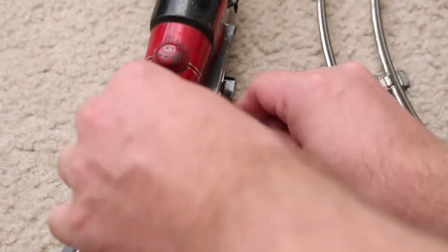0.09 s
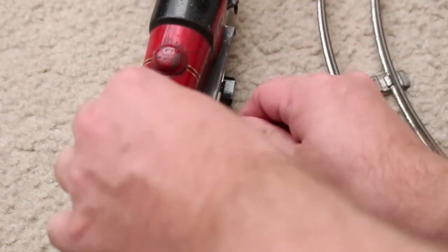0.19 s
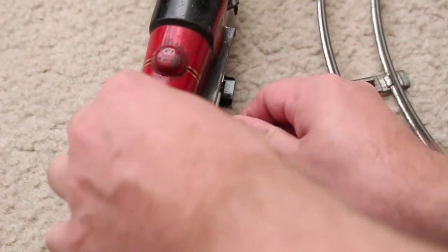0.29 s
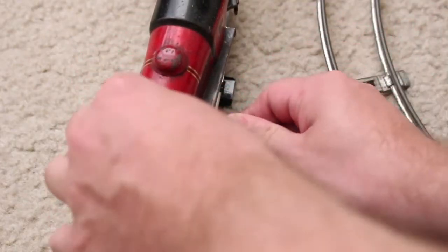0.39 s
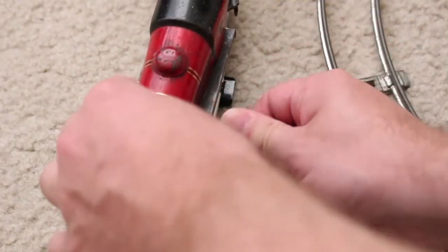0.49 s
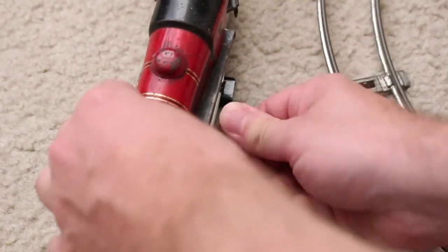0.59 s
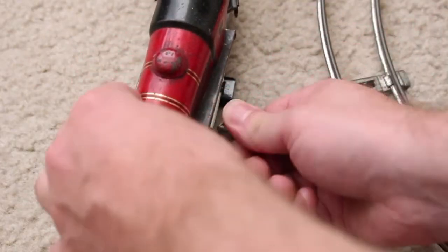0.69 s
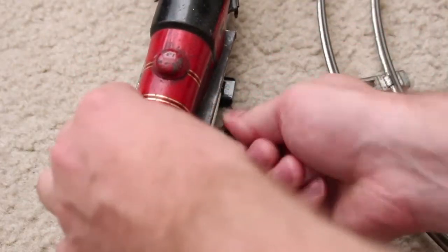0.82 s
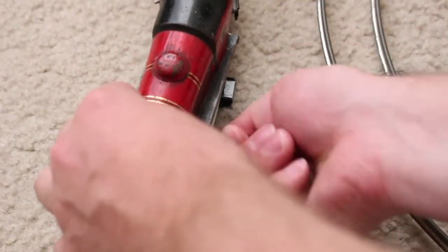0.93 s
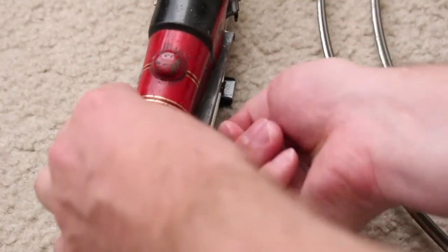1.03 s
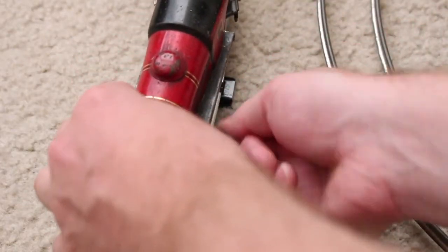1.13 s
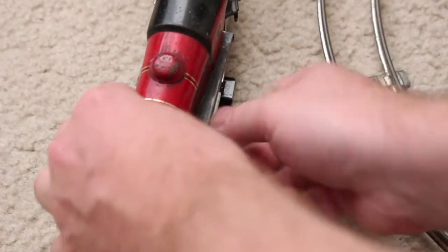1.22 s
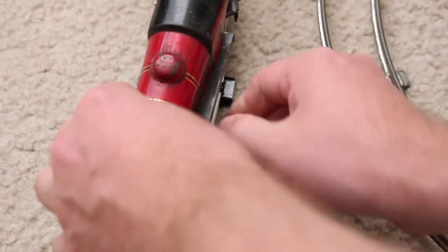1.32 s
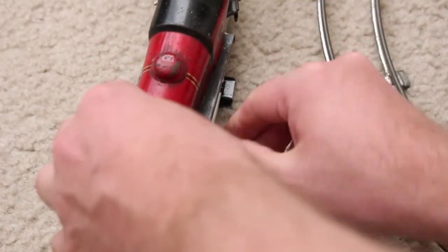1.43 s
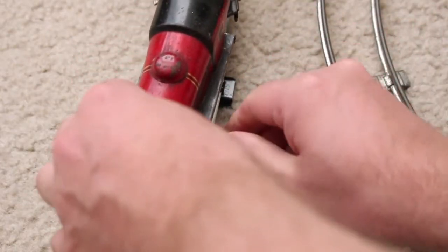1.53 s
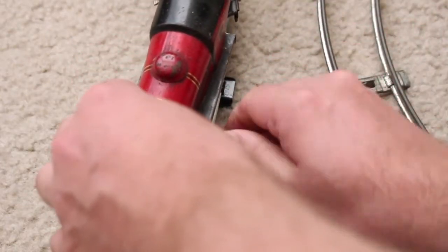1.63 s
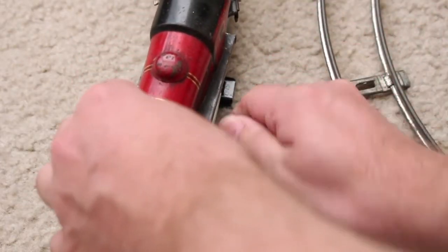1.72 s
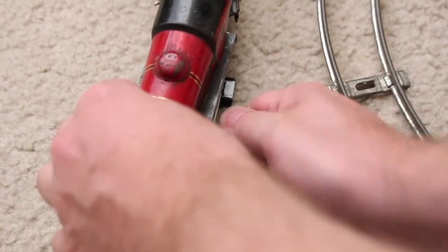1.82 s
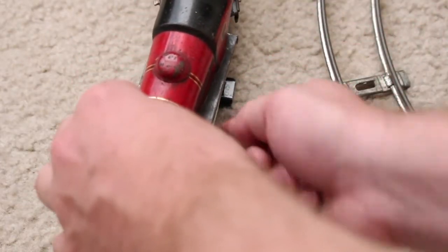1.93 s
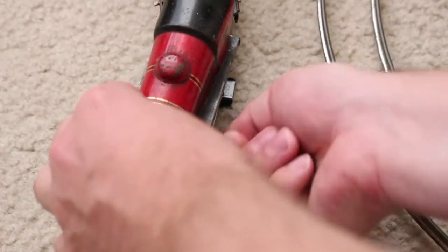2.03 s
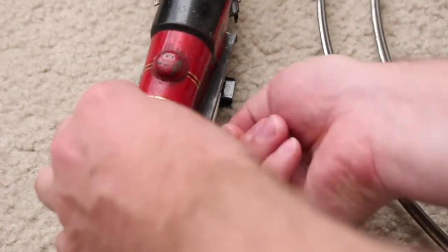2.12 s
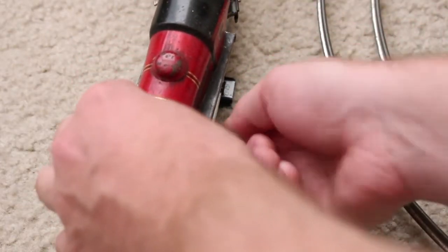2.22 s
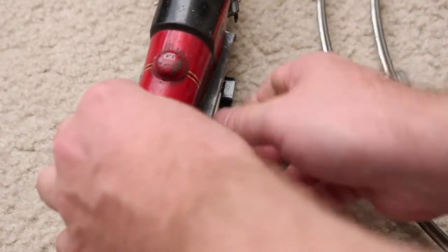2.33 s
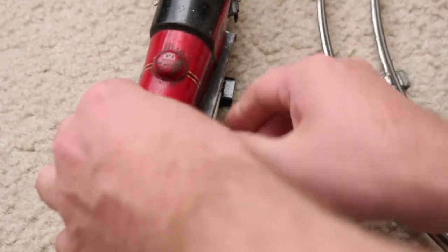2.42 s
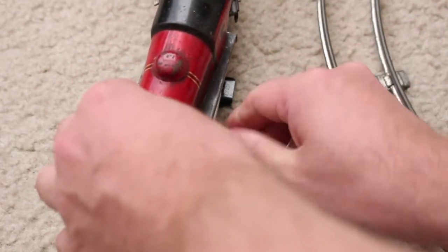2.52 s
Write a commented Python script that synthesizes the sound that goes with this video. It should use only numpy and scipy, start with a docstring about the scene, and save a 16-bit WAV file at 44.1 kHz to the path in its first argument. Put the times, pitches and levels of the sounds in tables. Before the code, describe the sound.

A key winds a tin toy train in two short runs of metallic clicks.

```python
"""A clockwork toy locomotive is wound by hand on a carpet in a quiet, faintly humming room.
First the key rubs and knocks in its socket. From 0.2 s to 1 s the pawl slips off five ratchet teeth;
each impact excites the modes of the tin body, a near surface reflects it and the room reverberates.
The key alone knocks and rubs between turns, until four quick clicks follow from 1.8 s to 2.1 s.
Loose knocks of the key close the winding at 2.5 s."""
import sys
import numpy as np
from scipy import signal
from scipy.fft import rfft, irfft
from scipy.io import wavfile
from scipy.ndimage import uniform_filter1d

SR = 44100
rng = np.random.default_rng(int(sys.argv[2]) if len(sys.argv) > 2 else 0)


def file_out(sig):
    """Save sig as 16-bit WAV at sys.argv[1]."""
    # one column per channel
    cols = np.atleast_2d(sig).T
    # limit, then scale
    lim = np.clip(cols, -1, 1)
    pcm = np.round(lim * 32767).astype(np.int16)
    wavfile.write(sys.argv[1], SR, pcm)


N = 112455

# Pawl impacts: (time [s], level [dB], thud [dB], clang centre [Hz], clang [dB], treble [dB],
# slip re level [dB], low ping [Hz], low ping [dB], high ping [Hz], high ping [dB])
PAWL_CLICKS = [ (0.2111, -0.5, -4, 1850, 5, 0, -6.5, 1585, 6.5, 8150, 6.5),
               (0.5950, -1.5, -4, 1300, 4.5, 0.5, -8.5, 2233, 9.5, 7970, 4.5),
               (0.7845, -7, 0, 1620, -4.5, -1, -7, 2053, 10.5, 3570, 12.5),
               (0.9138, -7.5, -4, 1450, 4.5, 0, 0.5, 1608, 12.5, 3550, 9.5),
               (0.9883, -10.5, 2.5, 1900, 0.5, 1, 1, 2020, 13, 10400, 3),
               (1.8288, -6.5, 3.5, 1990, 4, -2.5, -3, 2150, 6.5, 8080, 6.5),
               (1.918, -12, 10.5, 1300, 7, 1.5, -14, 3400, 6.5, 11000, 6.5),
               (2.0059, -6, -3.5, 1210, 5.5, -2.5, -13, 2100, 3.5, 3400, 6),
               (2.0927, -7, 4.5, 1520, 8.5, 0.5, -4, 1480, 0.5, 10900, 6)]
# Key impacts: (time [s], level [dB], thud [dB], clang centre [Hz], clang [dB], treble [dB])
KEY_KNOCKS = [ (0.051, -28, -25, 2270, 10, -19), (0.1473, -26.5, 16.5, 900, 0, -14),
              (0.586, -17, 8, 1700, -8, -17), (0.660, -28, -5, 1570, 19.5, -16),
              (0.976, -24, -1, 1910, 6, -5), (1.0132, -15.5, 0, 1820, 6.5, -7),
              (1.1015, -19.5, 6, 1710, -14, -13), (1.1076, -18, -7, 1620, 5, -0.5),
              (1.147, -24.5, 2, 1800, 2, -13), (1.1520, -21, 11, 1920, 6.5, 2),
              (1.245, -34, 9, 1570, 10, -1), (1.422, -27, 20, 1640, 8.5, -17),
              (1.4632, -24, 12.5, 950, 15, 5.5), (1.6878, -17.5, -7, 2200, 3, -9),
              (1.712, -40, 7, 2100, 24, -11), (1.715, -16.5, -0.5, 1350, -2.5, -1),
              (1.772, -27, -2, 2010, 10, -2), (1.998, -24, -18, 2050, 11, -5),
              (2.171, -27, -5, 1700, 11.5, -1), (2.213, -31.5, -5, 1700, 11, 1),
              (2.2231, -23, 1, 1580, -10, -5), (2.2290, -20, -13, 1600, 8.5, -0.5),
              (2.2686, -15.5, 6, 1800, 6, 2), (2.2829, -17.5, 10, 1780, 10.5, -1),
              (2.384, -38.5, 9, 1650, 18, -10), (2.5027, -33, 6, 1250, 11, 5),
              (2.5077, -22.5, 4.5, 1250, 8, 0.5)]
# Dull top of the key knocks, falling away above about 8.5 kHz: (frequency [Hz], gain [dB])
KNOCK_ROLLOFF = [(8500, 1), (12000, -7), (16000, -16)]
# Key friction as the hand shifts: (time [s], duration [s], level [dB])
KEY_RUBS = [(0.0, 0.06, -45.5), (0.191, 0.038, -42), (0.716, 0.029, -46.5), (0.941, 0.036, -43.5),
            (1.253, 0.059, -49), (1.415, 0.02, -54.5), (2.373, 0.021, -52)]
# Spectrum of sliding contact: (frequency [Hz], gain [dB])
SLIDE_SPECTRUM = [(200, 8), (800, -8.5), (1500, -3), (2400, -5.5), (4000, -11.5), (8000, -14.5),
                  (16000, -27.5)]
# Modes of the tin body and spring housing: (frequency [Hz], peak gain [dB], T60 [s])
TIN_MODES = [(595, -2, 0.034), (679, -1.5, 0.09), (856, -5.5, 0.022), (1337, 2.5, 0.049), (1330, -13, .06),
             (1574, 10.5, 0.63), (1584, 9.5, 0.087), (1690, 8, 0.14), (1730, 4.5, 0.063),
             (2157.5, 8.5, 0.042), (2455, 10.5, 0.16), (3134, 2.5, 0.017), (3587, 0.5, 0.045),
             (7740, -2.5, 0.016)]
# Dry crack of a contact: (frequency [Hz], gain [dB])
CRACK_SPECTRUM = [(100, -22), (300, -13), (600, -8.5), (1000, -3.5), (1400, 4.5), (2200, 1.5), (2800, -0.5),
                  (3400, -2), (4300, -1.5), (7000, -0.5), (11000, 0.5), (14300, -1.5), (16000, -15)]
# Spectrum of the reverberant tail: (frequency [Hz], gain [dB])
TAIL_SPECTRUM = [(200, 6), (800, -2.5), (1700, -6), (4000, 0.5), (9000, -1.5), (16000, -8)]
# Reverberation time: (frequency [Hz], T60 [s])
TAIL_T60 = [(200, 0.38), (800, 0.35), (2000, 0.27), (5500, 0.29), (9000, 0.23), (15000, 0.27)]
# Left-right coherence of the direct sound: (frequency [Hz], correlation [0 to 1])
DIRECT_COHERENCE = [(500, 1), (1800, 0.96), (4000, 0.69), (8000, 0), (14000, 0)]
# Left-right coherence of the diffuse field: (frequency [Hz], correlation [-1 to 1])
ROOM_COHERENCE = [(40, -0.71), (150, 0.11), (700, 0.07), (1700, 0.53), (4000, 0.25), (8000, 0.12),
                  (14000, -0.12)]
# Level difference between the channels: (frequency [Hz], left minus right [dB])
BALANCE = [(60, -8.5), (300, -2.5), (1200, -0.4), (2100, -2.5), (4000, 0), (8000, -0.5), (14000, -1.3)]
# Noise of the still room: (frequency [Hz], relative level [dB])
AIR_SPECTRUM = [(15, -53), (25, -7.5), (108, -8.5), (175, -3.5), (363, -12.5), (427, -7), (545, -13.5),
                (775, -13.5), (1890, -16.5), (2050, -14), (2480, -19.5), (3920, -20), (4870, -20.5),
                (6050, -21.5), (16000, -29.5)]
# Faint hum in the room: (frequency [Hz], RMS level [dB])
HUM_TONES = [(84, -76), (192, -76.5)]

SIZE, RESPONSE_SAMPLES = 24576, 20000  # transform size; the part of each response that is used
T = np.arange(SIZE) / SR
HZ = np.maximum(np.fft.rfftfreq(SIZE, 1 / SR), 1)
RISE_S, PAWL_CHATTER_S, KNOCK_CHATTER_S = 0.00075, 0.0021, 0.0034  # a loose knock chatters longer
SLIP_LEAD_S, SLIP_DECAY_S = 0.0024, 0.0049
ROOM_DELAY_S = 0.006
ROOM_DETAIL_SHARE = 0.45  # pings and small modes beam in all directions, so the room evens them out


def ratchet(tin):
    """Impact excitation: the pawl slides off a tooth, then snaps onto the next and rings the body."""
    out, slide = np.zeros((2, N)), minimum_phase(at_hz(SLIDE_SPECTRUM))
    for onset, db, *tone, slip_db, low_hz, low_db, high_hz, high_db in PAWL_CLICKS:
        near, diffuse = room()  # the moving hands scatter each click anew
        detail_db = ping(low_hz, low_db) + ping(high_hz, high_db) + small_modes()
        slip = from_db(db + slip_db) * burst(SLIP_DECAY_S) * slide * (near + diffuse)
        paths = near * minimum_phase(detail_db) + diffuse * minimum_phase(ROOM_DETAIL_SHARE * detail_db)
        snap = burst(PAWL_CHATTER_S) * minimum_phase(contact_colour(db, *tone)) * paths
        click = slip + snap * delay(SLIP_LEAD_S)
        add(out, onset - SLIP_LEAD_S, irfft(click * tin)[:, :RESPONSE_SAMPLES])
    return out


def key(tin, grains_per_s=2500, grain_spread_db=4.5):
    """Impact and friction: the loose key knocks and rubs in its socket, driving the body."""
    force, slide = np.zeros(N), minimum_phase(at_hz(SLIDE_SPECTRUM))
    for onset, *tone in KEY_KNOCKS:
        chatter = burst(KNOCK_CHATTER_S)
        colour_db = contact_colour(*tone) + at_hz(KNOCK_ROLLOFF) + ROOM_DETAIL_SHARE * small_modes()
        add(force, onset, irfft(chatter * minimum_phase(colour_db)))
    for onset, duration, db in KEY_RUBS:
        grains = (rng.random(SIZE) < grains_per_s / SR) * rng.choice([-1, 1], SIZE)
        grains = grains * from_db(grain_spread_db * rng.standard_normal(SIZE))
        rub = grains / grains.std() * (T < duration)
        add(force, onset, from_db(db) * irfft(rfft(rub) * slide))
    response = irfft(tin * sum(room()))[:, :RESPONSE_SAMPLES]
    return signal.fftconvolve(force[None], response, axes=1)[:, :N]


def burst(decay_s):
    """Random superposition: tiny impulses swell and die away as noise; returns its whitened spectrum."""
    spectrum = rfft(rng.standard_normal(SIZE) * (1 - np.exp(-T / RISE_S)) * np.exp(-T / decay_s))
    power = uniform_filter1d(abs(spectrum) ** 2, size=141)
    return spectrum * minimum_phase(-10 * np.log10(power + 1e-12))


def contact_colour(db, thud_db, clang_hz, clang_db, treble_db, thud_hz=880, treble_hz=4850):
    """Excitation spectrum in dB: where and how hard a blow lands sets its tone."""
    thud = thud_db / (1 + (HZ / thud_hz) ** 4)
    treble = treble_db / (1 + (treble_hz / HZ) ** 4)
    clang = clang_db * np.exp(-.5 * (np.log2(HZ / clang_hz) / 0.31) ** 2)  # spread of 0.31 octave
    return db + thud + treble + clang


def tin_body():
    """Modal superposition: the locomotive's damped modes add in power to a broadband crack."""
    power = from_db(at_hz(CRACK_SPECTRUM)) ** 2
    for hz, db, t60 in TIN_MODES:
        width_hz = np.log(1000) / np.pi / t60
        _, mode = signal.freqz(*resonance(hz, width_hz), worN=HZ, fs=SR)
        power = power + abs(from_db(db) * mode) ** 2
    return minimum_phase(10 * np.log10(power))


def ping(hz, db, q=15):
    """Resonance: the Lorentzian peak, in dB, of one mode that a blow favours."""
    detuning = 2 * q * (HZ / hz - 1)
    return 10 * np.log10(1 + (from_db(db) ** 2 - 1) / (1 + detuning ** 2))


def small_modes(ripple_db=4.5, spacing_hz=227.4, from_hz=3300):
    """Modal overlap: many short high modes, mixed anew by each blow, ripple the spectrum in dB."""
    ripple = np.interp(HZ / spacing_hz, np.arange(512), rng.standard_normal(512))
    return ripple_db * ripple / (1 + (from_hz / HZ) ** 2)


def room(echo_s=0.0048, skew_s=0.00004, echo_db=-9, smear_s=0.00054, early_db=-5.5, early_t60_s=0.047):
    """Multipath propagation: direct sound with one near reflection, and early scatter with the tail."""
    direct = stereo(1, burst(smear_s), DIRECT_COHERENCE)
    echo = from_db(echo_db) * stereo(burst(smear_s), burst(smear_s), DIRECT_COHERENCE)
    echo = echo * delay(echo_s + skew_s * np.array([[0], [1]]))  # reaches the right side later
    early = [from_db(early_db) * burst(early_t60_s / np.log(1000)) * delay(ROOM_DELAY_S)
             for _ in range(2)]
    diffuse = stereo(early[0] + tail(), early[1] + tail(), ROOM_COHERENCE)
    return (direct + echo) * pan(), diffuse * pan()


def tail():
    """Reverberation: the spectrum of a diffuse field in which each band decays at its own rate."""
    white, out = rfft(rng.standard_normal(SIZE)), 0
    edges = np.geomspace(100, 18000, 16)
    for low, high in zip(edges, edges[1:]):
        hz, band = np.sqrt(low * high), (HZ >= low) & (HZ < high)
        decay = np.exp(-np.log(1000) * T / at_hz(TAIL_T60, hz)) * (T > ROOM_DELAY_S)
        ring = irfft(white * band) * decay
        out = out + ring * np.sqrt(band.mean() / np.sum(ring ** 2)) * from_db(at_hz(TAIL_SPECTRUM, hz))
    return rfft(out)


def air(noise_db=-61, hum_width_hz=7.9):
    """Ambient noise: a steady broadband floor, and a hum that wavers as narrow-band noise does."""
    hz = np.maximum(np.fft.rfftfreq(N, 1 / SR), 1)
    white = stereo(*rfft(rng.standard_normal((2, N))), ROOM_COHERENCE, hz)
    noise = irfft(white * from_db(at_hz(AIR_SPECTRUM, hz)) * pan(hz), N)
    out = from_db(noise_db) * noise / noise.std()
    for hum_hz, db in HUM_TONES:
        b, a = resonance(hum_hz, hum_width_hz)
        drive = rng.standard_normal(N + SR)  # one extra second lets the resonance settle
        hum = signal.lfilter(b, a, signal.lfilter(b, a, drive))[SR:]
        out = out + from_db(db) * hum / hum.std()
    return out


def resonance(hz, width_hz):
    """Damped oscillator: two-pole filter coefficients with unit peak gain."""
    r = np.exp(-np.pi * width_hz / SR)
    return (1 - r * r) / 2 * np.array([1, 0, -1]), [1, -2 * r * np.cos(2 * np.pi * hz / SR), r * r]


def minimum_phase(db):
    """Causality: folding the cepstrum gives the minimum-phase response with these levels."""
    cepstrum = irfft(np.log(from_db(db)))
    cepstrum[1:SIZE // 2] *= 2
    cepstrum[SIZE // 2 + 1:] = 0
    return np.exp(rfft(cepstrum))


def stereo(mid, side, coherence, hz=HZ):
    """Partial coherence: a weighted sum and difference of unrelated spectra give left and right."""
    c = np.clip(at_hz(coherence, hz), -1, 1)
    return np.sqrt((1 + c) / 2) * mid + np.sqrt((1 - c) / 2) * side * np.array([[1], [-1]])


def pan(hz=HZ):
    """Level difference: left and right gains, each taking half of the balance."""
    return from_db(at_hz(BALANCE, hz) * np.array([[.5], [-.5]]))


def delay(seconds):
    """Shift theorem: a delay is a phase lag proportional to frequency."""
    return np.exp(-2j * np.pi * HZ * seconds)


def from_db(db):
    """Decibel scale: 20 dB is a factor of ten in amplitude."""
    return 10 ** (np.asarray(db) / 20)


def at_hz(points, hz=HZ):
    """Interpolation of a table on a log-frequency axis."""
    frequencies, values = np.transpose(points)
    return np.interp(np.log(hz), np.log(frequencies), values)


def add(out, onset, sound):
    """Superposition: a sound joins the mix at its onset."""
    start = max(int(onset * SR), 0)
    out[..., start:start + sound.shape[-1]] += sound[..., :max(N - start, 0)]


def scene():
    """Linear superposition: ratchet and key radiate through one body, over the room's noise."""
    tin = tin_body()
    return ratchet(tin) + key(tin) + air()


def record(dry):
    """Band limiting: a steep elliptic low-pass removes the treble above 16 kHz."""
    return signal.sosfilt(signal.ellip(10, .2, 80, 16000, fs=SR, output="sos"), dry)


dry = scene()
out = record(dry)
file_out(out)
```